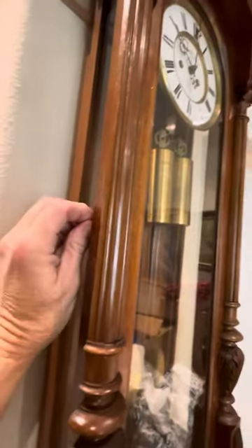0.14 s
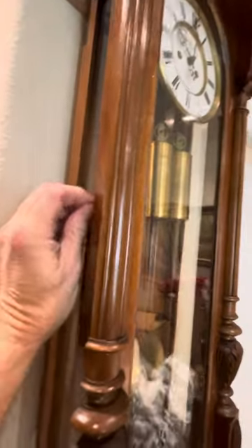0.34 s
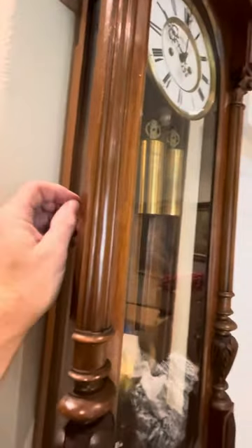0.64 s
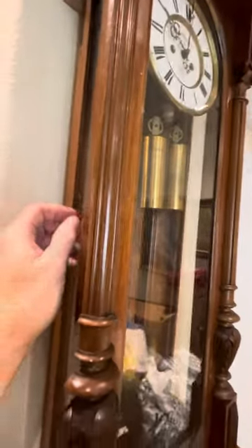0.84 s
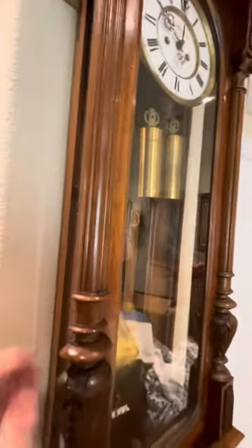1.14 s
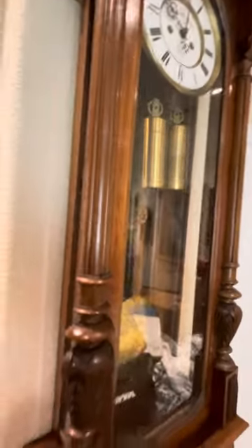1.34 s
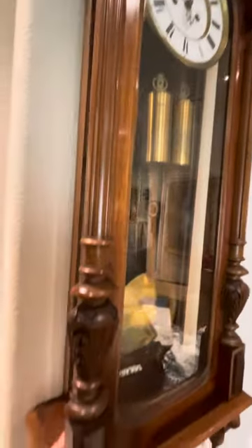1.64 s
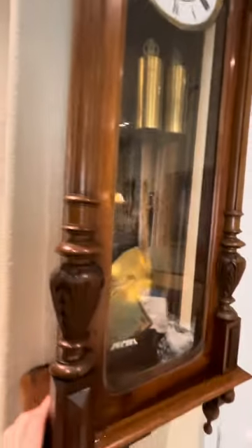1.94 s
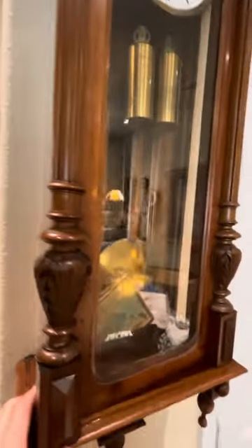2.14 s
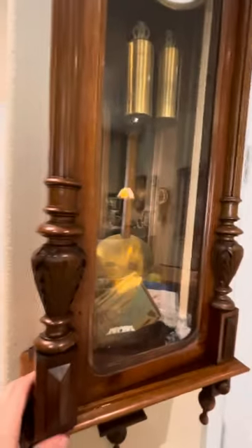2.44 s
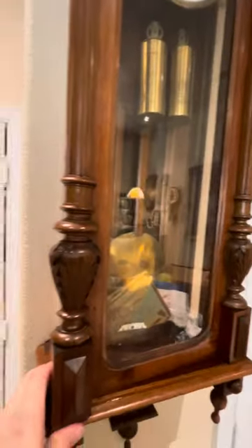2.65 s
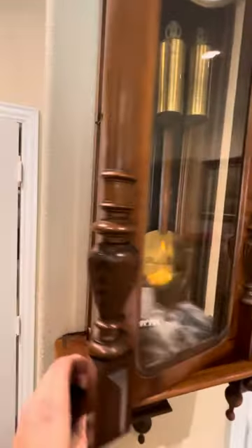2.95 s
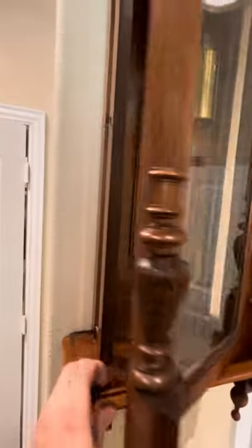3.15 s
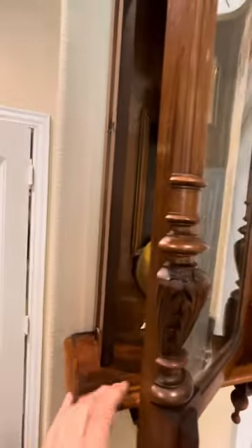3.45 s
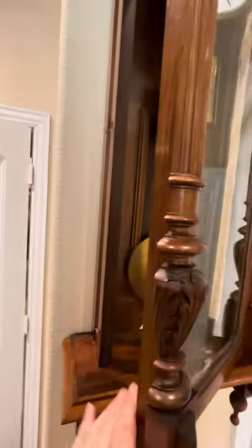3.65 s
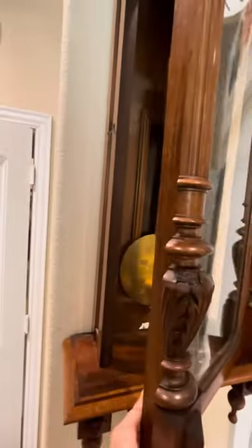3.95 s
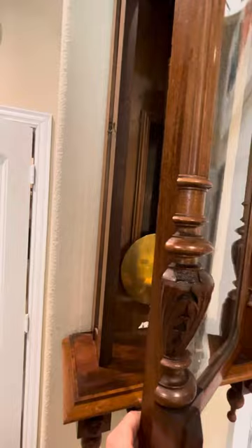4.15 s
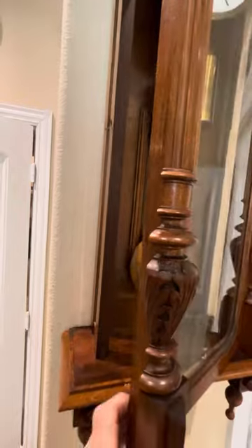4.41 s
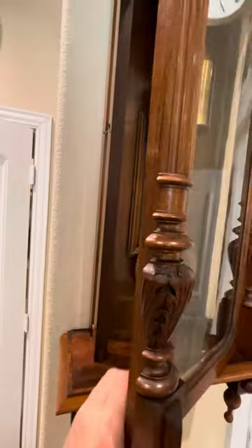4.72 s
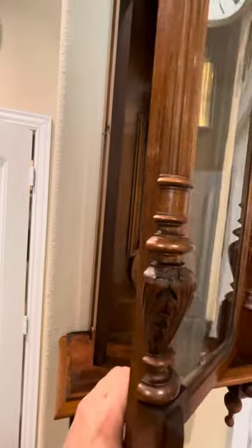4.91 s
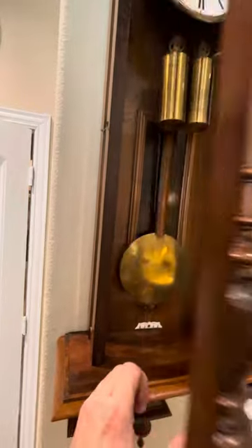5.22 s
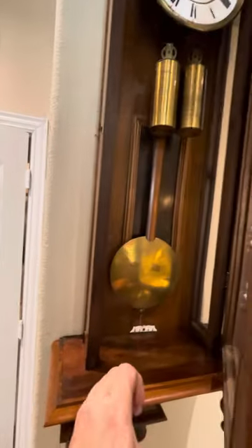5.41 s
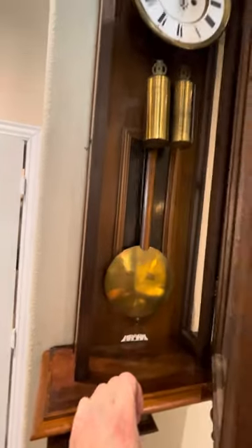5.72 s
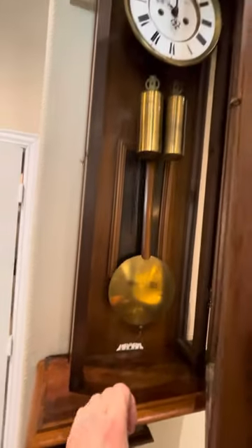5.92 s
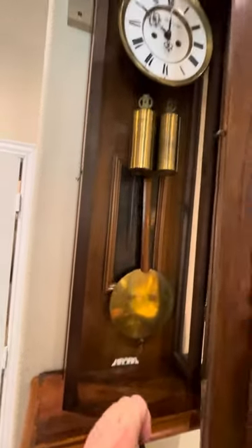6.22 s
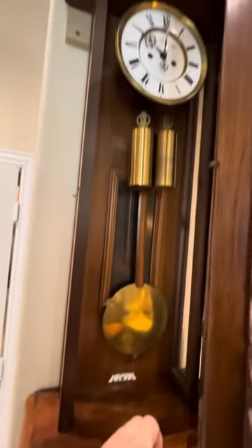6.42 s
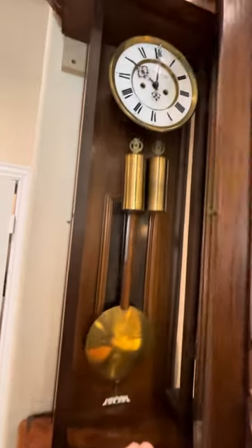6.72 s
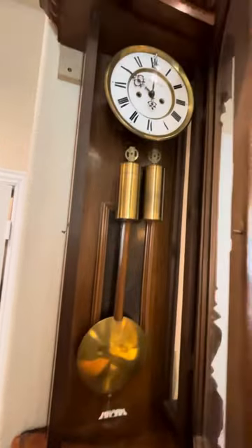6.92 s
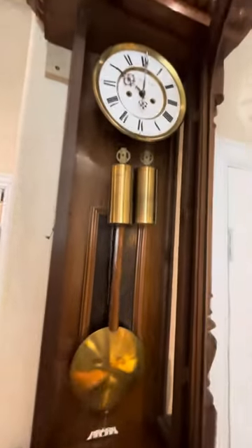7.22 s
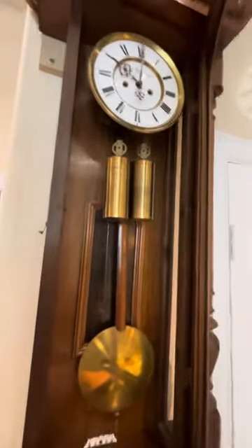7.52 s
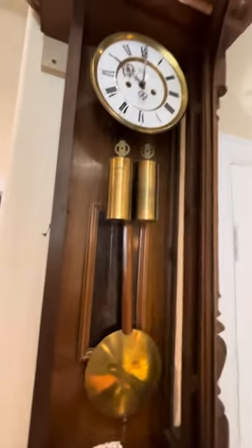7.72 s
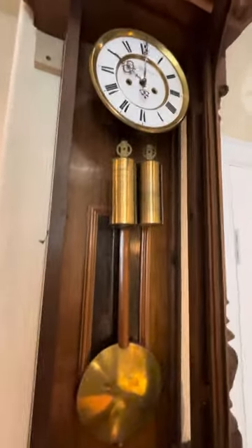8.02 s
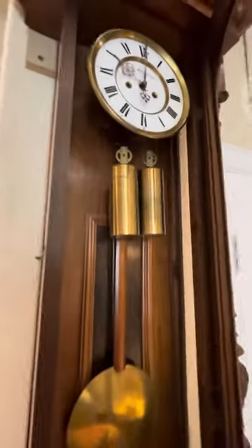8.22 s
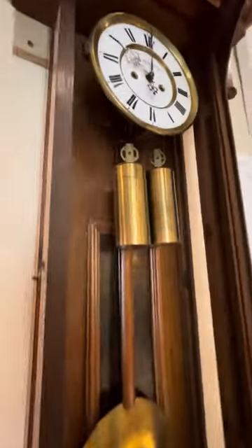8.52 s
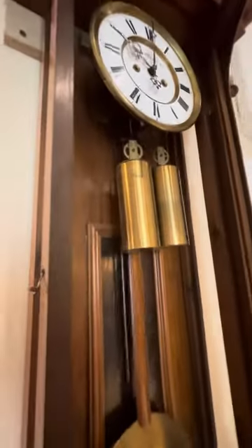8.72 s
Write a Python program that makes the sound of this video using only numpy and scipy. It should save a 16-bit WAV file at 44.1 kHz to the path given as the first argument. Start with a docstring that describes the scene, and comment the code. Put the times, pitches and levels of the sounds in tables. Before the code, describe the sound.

A pendulum wall clock ticks softly and evenly in a quiet room while a hand unlatches its wooden door with snaps, knocks and a brief hinge creak.

```python
"""A room with a pendulum wall clock, ticking softly while a hand unhooks and opens its glazed wooden door.
Catch and door are shaped noise contacts ringing panel and brass; the hinge judders in slips over a noise drag.
Fingers and sleeve are clumpy filtered noise, soft bumps ring the hollow case, and short contacts the movement.
Random echoes, a wavering rumble and still air surround it, heard through a close pair of microphone ports."""
import sys
import numpy as np
from scipy import signal
from scipy.fft import rfft, irfft, next_fast_len
from scipy.io import wavfile

SR = 44100
rng = np.random.default_rng(int(sys.argv[2]) if len(sys.argv) > 2 else 0)


def inscribe(sig):
    """Save sig as 16-bit PCM at rate SR to the path in sys.argv[1].

    A 1-D sig is mono; a 2-D sig holds one channel per row.
    Samples are clipped to [-1, 1] before scaling.
    """
    pcm = np.round(np.clip(np.atleast_2d(sig).T, -1, 1) * 32767)
    wavfile.write(sys.argv[1], SR, pcm.astype(np.int16))


N = 390726
TIME = np.arange(N) / SR  # seconds

# Snaps and knocks of catch and door. Each row: start in seconds, relative level in dB, hardness 0-1,
# relative thump level in dB, resonance of the spot in Hz, boost of that resonance in dB.
KNOCKS = [(0.193, -36.5, 0.71, 15, 900, 3), (0.198, -37.5, 0.54, 10, 330, -7),
          (0.549, -52.5, 0.79, 11.5, 500, 6), (1.176, -76.5, 0.54, 3, 2300, 2),
          (1.847, -48.5, 0.42, 8, 860, 4), (2.0767, -32.5, 0.8, 7.5, 4300, 9.5),
          (2.626, -34.5, 1, 1, 4900, 5.5), (2.779, -48, 0.53, -14.5, 1700, -4.5),
          (2.807, -22, 0.98, 1, 6000, 8), (3.038, -50.5, 0.7, 5, 1700, 7.5),
          (3.222, -53, 0.2, -9, 750, -20), (3.512, -67.5, 0.6, -27, 3200, 14.5),
          (3.527, -39.5, 0.7, 3.5, 3100, 3), (3.7901, -28, 0.87, 0.5, 760, 3.5),
          (4.296, -55.5, 0, 9, 1300, 11.5), (4.314, -37.5, 0.5, 10, 2650, 5),
          (4.33, -39.5, 0.6, 6.5, 2700, 8), (4.564, -68.5, 0.3, -2.5, 1250, 16.5),
          (4.642, -54, 0.9, 14, 1150, 8.5), (4.9247, -25, 1, 7.5, 1070, 5), (4.93, -28, 0.98, 0, 5500, 4),
          (5.351, -54.5, 0.57, 7.5, 5500, -13), (5.4287, -41.5, 0.52, 3, 910, 0),
          (5.513, -47, 0.15, -6, 700, -3), (5.58, -58, 0.06, 0.5, 900, -9), (5.635, -64, 0.35, 10, 700, -3),
          (5.7803, -56.5, 0.86, -9, 3900, 7), (7.872, -42.5, 0.49, -2.5, 2600, 10)]
# Spectrum of the knocks. Each row: frequency in Hz, density in dB per Hz.
KNOCK_COLOUR = [(100, 6.5), (300, 4), (700, 11.5), (1300, 12), (2300, 5), (3700, -4), (5700, -3.5),
                (8500, 2), (11200, 2.5), (12500, -9.5), (13500, -27.5), (15500, -36)]
# Short ring of the wooden door panel. Each row: frequency in Hz, level in dB, t60 in seconds.
PANEL = [(420, -30, .06), (580, -35, .09), (690, -31, .04), (812, -31, .09), (1080, -27, .045),
         (1474, -33, .1), (2126, -26, .035), (2380, -29, .05), (2900, -29, .04), (4213, -28, .018)]
# Bright ring of the brass catch. Each row: frequency in Hz, level in dB, t60 in seconds.
CATCH = [(5050, -34, .07), (5503, -22, .04), (5737, -27, .12), (6187, -27, .035), (10580, -26, .07),
         (10790, -19, .035), (11410, -18, .025)]

# Jerks as the hinge lets go. Each row: start in seconds, relative level in dB, hardness 0-1.
SLIPS = [(6.552, -53, 0.11), (6.592, -56.5, 0), (6.637, -62, 0.2), (6.657, -52, 0.05), (6.702, -58, 0.16),
         (6.742, -57.5, 0), (6.775, -58.5, 0), (6.825, -56, 0.04), (6.883, -52.5, 0.22), (6.928, -52, 0.36),
         (6.962, -51, 0.21), (7.004, -47.5, 0.14), (7.051, -40, 0.6), (7.0936, -40.5, 0.57),
         (7.135, -39, 0.7), (7.171, -45, 0.43), (7.212, -46.5, 0.36), (7.25, -47.5, 0.41),
         (7.312, -59.5, 0.23)]
# Spectrum of a slip. Each row: frequency in Hz, density in dB per Hz.
SLIP_COLOUR = [(100, 6.5), (300, 2), (700, 12.5), (1400, 12), (2200, 6.5), (3800, -6), (6000, -1),
               (8500, 4), (11000, 6), (12500, -35), (14000, -10), (16000, -34.5)]
# Ring of door and hinge under a slip. Each row: frequency in Hz, level in dB, t60 in seconds.
HINGE = [(330, -36, .03), (730, -29, .03), (1150, -30, .03), (1570, -29, .05), (2650, -30, .025),
         (5330, -26, .06)]
# Force of the drag on the hinge as the door swings. Each row: time in seconds, relative level in dB.
DRAG = [(6.555, -53), (6.88, -53.5), (7.03, -46), (7.05, -39), (7.14, -38.5), (7.26, -46), (7.3, -55),
        (7.38, -72)]
# Spectrum of the hinge drag. Each row: frequency in Hz, density in dB per Hz.
DRAG_COLOUR = [(40, -45), (100, -10), (300, -20), (500, 0), (900, -2), (1500, -14), (3000, 6), (5500, -30),
               (9000, -10), (12000, -13.5), (15000, -107)]

# Strokes of hand and sleeve on the wood. Each row: start in seconds, length in seconds,
# relative rub level in dB, relative rustle level in dB.
STROKES = [(0.0, 0.34, -67.5, -98), (0.3, 0.39, -70, -105), (0.693, 0.056, -77, -94.5),
           (0.782, 0.024, -68, -85.5), (1.387, 0.32, -115, -100.5), (1.55, 0.25, -90, -99.5),
           (1.851, 0.043, -69, -79), (1.891, 0.03, -55, -87), (2.05, 0.19, -66.5, -98),
           (2.284, 0.26, -97, -97.5), (2.613, 0.039, -55, -87), (2.799, 0.025, -46, -68),
           (2.892, 0.22, -58, -84), (3.148, 0.025, -54.5, -79), (3.373, 0.17, -72, -91.5),
           (3.534, 0.33, -71.5, -92), (3.964, 0.033, -78, -83), (4.225, 0.22, -71, -84.5),
           (4.356, 0.3, -64.5, -112), (4.694, 0.2, -66.5, -85), (4.975, 0.3, -68, -79.5),
           (5.38, 0.13, -60.5, -95), (5.62, 0.28, -70, -100), (6.36, 0.16, -74, -103), (8.3, 0.5, -77, -99),
           (7.851, 0.14, -74, -81.5), (8.142, 0.081, -74, -76)]
# Spectrum of skin on wood. Each row: frequency in Hz, density in dB per Hz.
RUB_COLOUR = [(60, 5), (150, 2), (300, 0), (500, -8), (800, -3.5), (1500, -15), (4000, -26.5),
              (12000, -60.5)]
# Spectrum of the sleeve. Each row: frequency in Hz, density in dB per Hz.
RUSTLE_COLOUR = [(400, -2.5), (1200, -2), (2800, 4.5), (4000, -4.5), (5500, -0.5), (8000, -6), (10000, -2),
                 (11300, -3.5), (12800, -48), (16000, -50.5)]
# Fingertips scuffing the hollow wood. Each row: start in seconds, relative level in dB, pitch in Hz,
# time scale of the swell and fade in seconds.
SCUFFS = [(0.816, -62, 700, 0.046), (1.871, -71, 637, 0.14), (1.908, -76, 2100, 0.041),
          (1.914, -60.5, 4730, 0.019), (3.202, -60, 750, 0.026), (5.514, -55, 690, 0.008)]

# Soft bumps of door and hand on the case. Each row: start in seconds, relative level in dB,
# length of the push in seconds.
BUMPS = [(0.202, -32.5, 0.0009), (0.409, -40, 0.0051), (0.472, -42.5, 0.0051), (1.949, -41.5, 0.00092),
         (2.105, -41, 0.0055), (2.809, -28.5, 0.00055), (2.896, -37, 0.00072), (2.991, -35, 0.0025),
         (3.04, -42, 0.0015), (3.497, -45.5, 0.0043), (4.068, -40.5, 0.0036), (4.31, -22, 0.004),
         (4.357, -24, 0.0059), (4.575, -49, 0.0027), (4.639, -41.5, 0.0045)]
# Boom of the hollow case. Each row: frequency in Hz, level in dB, t60 in seconds.
CASE = [(81, -14, .15), (139, -2, .28), (183, -4, .12), (232, 0, .09), (292, 1, .12), (334, -5, .08),
        (415, -14, .06), (506, -18, .06), (690, -16, .06), (812, -16, .06)]
# Padded knocks of the open door and the hand. Each row: start in seconds, level in dB, pitch in Hz.
NUDGES = [(1.857, -46, 470), (7.538, -51, 375), (7.557, -48, 390), (7.677, -53, 340), (8.249, -38.5, 450)]
# Ring of a padded knock. Each row: multiple of the pitch, level in dB, t60 in seconds.
NUDGE_RING = [(1, 0, .045), (1.58, -9, .03), (2.5, -6, .03), (4.6, -11, .015)]
# Small hollow pips of the door frame. Each row: start in seconds, relative level in dB.
PIPS = [(1.978, -47.5), (2.4773, -60), (6.488, -47)]
# Ring of the door frame. Each row: frequency in Hz, level in dB, t60 in seconds.
FRAME = [(1620, -2, .024), (2080, -4, .028), (3800, -13, .02)]

# Ring of the brass movement. Each row: frequency in Hz, level in dB under the tick,
# level in dB under the tock, t60 in seconds.
MOVEMENT = [(1320, -1, 2, .03), (2170, 3, -6, .035), (2390, 0, 2, .03), (2740, 5, 5, .04),
            (3150, -2, 3, .018), (5420, -1, -9, .035)]
# Level of the beat as the listener moves and the door opens. Each row: time in seconds, relative level in dB.
BEAT_LEVEL = [(.8, -49.5), (1.5, -53), (2.3, -55), (5.2, -49), (7.4, -48.5), (8.2, -44)]

# Spectrum of the low sway. Each row: frequency in Hz, density in dB per Hz.
RUMBLE_COLOUR = [(20, -30), (35, -8), (48, 0), (75, -4), (110, -6), (200, -18), (500, -42), (3000, -90)]
# Spectrum of the still air. Each row: frequency in Hz, density in dB per Hz.
AIR = [(60, 6), (110, 0), (200, -12), (450, -20), (1200, -19), (4000, -20), (7000, -25), (11000, -30),
       (13000, -40), (15000, -52)]
# The room. Each row: frequency in Hz, t60 in seconds, echo level in dB.
ROOM = [(100, 0.43, 0.5), (298, 0.19, 3), (1179, 0.34, 1), (3500, 0.3, -5.5), (7137, 0.38, -4),
        (13000, 0.6, -14.5)]
# The microphone ports. Each row: frequency in Hz, phase lag of the right port in radians,
# left-right likeness 0-1, left minus right in dB.
PORTS = [(100, 0, .95, 1), (300, .3, .85, 1), (420, 1.4, .55, 3), (600, 2.8, .35, 5.5), (1050, 3.3, .75, 3),
         (1400, 4.1, .5, 2), (1850, 3.6, .2, 0), (2400, 3.4, .65, -3), (3200, 4, .5, 0),
         (4100, 6, .45, -.5), (5400, 6.3, .5, 0), (6400, 6.7, .75, -1.7), (7500, 8.3, .7, -.5),
         (8300, 9, .95, -.5), (9500, 9.1, .98, -.5), (12200, 12.5, .98, 0), (13800, 13, .9, .5)]

# Contacts, (softest, hardest), before each source's own trim: less thump, more crack, shorter chatter.
THUMP_DB, CRACK_DB, CONTACT_T60_S = (7.5, -17), (-29.5, 6), (0.075, 0.014)
CONTACT_RISE_S = 0.0032  # time constant; the crack rises in half of it
SPOT_Q = 4
PANEL_DB, CATCH_DB = -14, -17
# From knock to knock: largest change of a mode's strength either way, and of its pitch as a share.
MODE_UNEVEN_DB, MODE_DETUNE = 4, .01

SLIP_STRETCH = 1.35  # multiplies the contact t60
SLIP_SPOT_HZ, SLIP_SPOT_DB = (600, 2800), 6  # each slip favours a random pitch in this span
# Small catches of the hinge: how many a second, spread of sizes, pitch span, level relative to the drag.
CREAKS_PER_S, CREAK_SPREAD_DB, CREAK_HZ, CREAK_DB = 160, 4, (350, 2200), -5
GRAIN_CYCLES, GRAIN_TILT_DB = 13, 4.5  # t60 of a grain in cycles; gain per octave above the lowest pitch

STROKE_ATTACK_S, STROKE_RELEASE_S = .03, .06  # linear rise; time constant of the fade
SCUFF_WIDTH = 1.32  # ratio of pitch to either side
# The loose door: contacts a second, level relative to the rub gain, spread of sizes, pitch span.
RATTLES_PER_S, RATTLE_DB, RATTLE_SPREAD_DB, RATTLE_BAND_HZ = 120, -1, 2.5, (300, 3000)

# The pendulum: one tick and one tock per swing, slightly out of beat.
FIRST_TOCK_S, FIRST_TICK_S, SWING_S = .009, .792, 1.4776
TOCK_DB = -.5  # tock strike relative to tick strike
DROP_CLICK_DB = 29  # gain of the band-passed strike beside its ring

# Low sway: at rest, then relative to the rub gain and to the hinge drag; depth of the waver.
REST_SWAY_DB, RUB_SWAY_DB, DRAG_SWAY_DB, SWAY_WAVER_DB = -66.5, 1, -4, 1
AIR_DB = -73  # rms ahead of the ports
TICK_ROOM_SHARE, THUD_ROOM_SHARE = .4, .6  # the rest stays close
ECHO_RISE_S, ECHOES_CHANGE_S, ECHO_UNEVEN_DB = .003, .9, 2.7
CUTOFF_HZ = 16500


def door():
    """Catch and door snap and knock, each spot with a short resonance of its own."""
    contacts = np.zeros((2, N))
    for s, db, hardness, thump_db, spot_hz, spot_db in KNOCKS:
        hit = blow(hardness, thump_db=thump_db + 4.5, crack_db=8.0, thump_t60=0.081, stretch=0.88)
        add(contacts, s, from_db(db) * wood(boost_spot(hit, spot_hz, spot_db)))
    return from_db(10.0) * colour(contacts, KNOCK_COLOUR)


def blow(hardness, thump_db, crack_db, thump_t60, stretch):
    """Wood struck: a low thump and a clack; a harder contact is shorter and cracks louder up high."""
    t60, rise = stretch * between(CONTACT_T60_S, hardness), CONTACT_RISE_S
    high_db = between(CRACK_DB, hardness) + crack_db
    low_db = between(THUMP_DB, hardness) + thump_db
    thump = from_db(low_db) * band(burst(thump_t60, rise), [130, 400], "band")
    clack = band(burst(t60, rise), [420, 2400], "band")
    snap = from_db(high_db / 2 + 11.0) * band(burst(t60, rise), [2500, 5500], "band")
    crack = from_db(high_db) * band(burst(t60 * .7, rise / 2), 5600, "high")
    return thump + clack + snap + crack


def boost_spot(hit, hz, db):
    """The spot that is struck resonates, lifting or dipping the contact around one pitch."""
    spot = signal.lfilter(*signal.iirpeak(hz, SPOT_Q, fs=SR), hit)
    return hit + (from_db(db) - 1) * spot


def wood(contact):
    """A contact rings the door panel and its brass catch, the modes in other proportions each time."""
    out = contact
    for modes, db in ((PANEL, PANEL_DB), (CATCH, CATCH_DB)):
        hz, mode_db, t60 = np.transpose(modes)
        detune, uneven = rng.uniform(-1, 1, (2, len(modes)))
        mode_hz = hz * (1 + MODE_DETUNE * detune)
        mode_level = mode_db + MODE_UNEVEN_DB * uneven
        out = out + from_db(db) * ring(contact, zip(mode_hz, mode_level, t60))
    return out


def hinge():
    """The hinge sticks and slips unevenly and rings the door; drag noise surges after each slip."""
    jerks = np.zeros((2, N))
    for s, db, hardness in SLIPS:
        hit = blow(hardness, thump_db=4.5, crack_db=10.5, thump_t60=0.15, stretch=SLIP_STRETCH)
        spot_hz = np.exp(rng.uniform(*np.log(SLIP_SPOT_HZ)))
        add(jerks, s, from_db(db) * boost_spot(hit, spot_hz, SLIP_SPOT_DB))
    jerks = colour(jerks, SLIP_COLOUR)
    judder = from_db(9.5) * jerks + from_db(-4.5) * ring(jerks, HINGE)
    starts = np.array(SLIPS)[:, 0]
    latest = np.maximum(np.searchsorted(starts, TIME) - 1, 0)
    since_slip = np.abs(TIME - starts[latest])
    sliding = from_db(-5) * np.exp(-since_slip / .02)
    return judder + sliding * level(DRAG) * friction(DRAG_COLOUR, grain_db=-1.0)


def creak():
    """Along with its jerks the dry hinge catches in many small ringing grains."""
    return from_db(CREAK_DB) * level(DRAG) * grains(CREAKS_PER_S, CREAK_SPREAD_DB, CREAK_HZ)


def strokes():
    """Gains of rub and rustle over time: each stroke swells, holds and dies away."""
    rub = rustle = 0
    for s, length, rub_db, rustle_db in STROKES:
        swell = np.clip((TIME - s) / STROKE_ATTACK_S, 0, 1)
        fade = np.exp(-np.clip((TIME - s - length) / STROKE_RELEASE_S, 0, 20))
        rub = rub + from_db(rub_db) * swell * fade
        rustle = rustle + from_db(rustle_db) * swell * fade
    return rub, rustle


def hand(rub, rustle):
    """Skin rubs in uneven scrapes and stirs the door panel; a sleeve brushes above it in pitch."""
    skin = friction(RUB_COLOUR, grain_db=4) * from_db(2 * flicker(25))
    cloth = friction(RUSTLE_COLOUR, grain_db=2.5) * from_db(1.5 * flicker(18))
    stirred = skin + from_db(-36.0) * ring(skin, PANEL)
    return from_db(9.5) * rub * stirred + from_db(27.0) * rustle * cloth


def scuffs():
    """A fingertip drags for a moment and the wood answers around one pitch, as band-passed noise."""
    out = np.zeros((2, N))
    for s, db, hz, length in SCUFFS:
        t = TIME[:SR // 2] / length
        grit = band(rng.standard_normal((2, len(t))), [hz / SCUFF_WIDTH, hz * SCUFF_WIDTH], "band")
        add(out, s, from_db(db + 33.5) * grit / grit.std() * t * np.exp(-3.5 * t))
    return out


def rattle(rub):
    """The loose glazed door rattles under the hand in small uneven contacts that follow the rub."""
    return from_db(RATTLE_DB) * rub * grains(RATTLES_PER_S, RATTLE_SPREAD_DB, RATTLE_BAND_HZ)


def bumps():
    """A soft push wakes the hollow case; the longer it lasts, the deeper the thud."""
    force = np.zeros((2, N))
    for s, db, length in BUMPS:
        push = np.hanning(max(int(length * SR), 8))
        add(force, s, from_db(db) * push / push.sum() * [[1], [.5]])
    # the thud carries nothing below about 90 Hz
    return band(ring(force, CASE), 90, "high")


def nudges():
    """A padded knock rings the wood for a few cycles, with no added crack."""
    out = np.zeros((2, N))
    for s, db, hz in NUDGES:
        modes = [(hz * ratio, mode_db, t60) for ratio, mode_db, t60 in NUDGE_RING]
        knock = ring(burst(t60=.02, rise=.001), modes)
        add(out, s, from_db(db) * knock / np.abs(knock).max())
    return out


def frame():
    """The door frame gives small dry pips: short contacts ringing three modes."""
    return from_db(9) * ring(taps(PIPS, t60=0.012, rise=0.001), FRAME)


def escapement():
    """The escape wheel drops on each pallet in turn, rattles briefly and rings the movement."""
    tick = taps(beats(FIRST_TICK_S, 0), t60=.055, rise=.002)
    tock = taps(beats(FIRST_TOCK_S, TOCK_DB), t60=.08, rise=.002)
    modes = np.array(MOVEMENT)
    rings = ring(tick, modes[:, [0, 1, 3]]) + ring(tock, modes[:, [0, 2, 3]])
    return rings + from_db(DROP_CLICK_DB) * band(tick + tock, [1100, 3500], "band")


def beats(first_s, db):
    """One pallet's drops, once a swing, as pairs of time in seconds and relative level in dB."""
    times = np.arange(first_s, TIME[-1], SWING_S)
    return zip(times, db + np.interp(times, *np.transpose(BEAT_LEVEL)))


def sway(rub):
    """Case and microphone sway: a wavering low rumble that grows as hand or hinge loads the case."""
    gain = from_db(REST_SWAY_DB) + from_db(RUB_SWAY_DB) * rub + from_db(DRAG_SWAY_DB) * level(DRAG)
    waver = from_db(SWAY_WAVER_DB * flicker(7))
    return gain * waver * friction(RUMBLE_COLOUR, grain_db=-2.0)


def still_air():
    """A steady bed of coloured noise, slightly grainy."""
    return from_db(AIR_DB) * friction(AIR, grain_db=3.0)


def room(x):
    """The listener keeps moving, so each stretch of sound meets another pattern of echoes."""
    out, size = x.copy(), int(ECHOES_CHANGE_S * SR)
    for start in range(0, N, size):
        add(out, start / SR, signal.fftconvolve(x[:, start:start + size], echoes(), axes=1))
    return out


def echoes():
    """Dense, uneven echoes build up over a few milliseconds and die at a rate of their own in each band."""
    t, edges, out = TIME[:SR * 3 // 5], np.geomspace(50, 16000, 11), 0
    for low, high in zip(edges, edges[1:]):
        hz = np.sqrt(low * high)
        decay = from_db(-60 * t / at_hz(ROOM, hz)) * (1 - np.exp(-(t / ECHO_RISE_S) ** 2))
        gain = from_db(at_hz(ROOM, hz, axis=2)) / np.sqrt(np.sum(decay ** 2))
        out = out + gain * decay * band(rng.standard_normal((2, len(t))), [low, high], "band")
    uneven = from_db(ECHO_UNEVEN_DB * flicker(500, size=len(t)))
    return out * uneven / np.sqrt(np.mean(uneven ** 2))


def ports(x):
    """Two close ports hear a common part and an opposed part; the right one lags in phase."""
    size = next_fast_len(N + SR // 10)
    common, apart = rfft(x, size)
    hz = np.arange(len(common)) * SR / size
    alike = np.clip(at_hz(PORTS, hz, axis=2), 0, 1)
    common = common * np.sqrt((1 + alike) / 2)
    apart = apart * np.sqrt((1 - alike) / 2)
    lean = from_db(at_hz(PORTS, hz, axis=3) / 2)
    lag = np.exp(-1j * at_hz(PORTS, hz, axis=1))
    left = (common + apart) * lean
    right = (common - apart) * lag / lean
    return irfft(np.array([left, right]), size)[:, :N]


def burst(t60, rise):
    """A contact: chatter, fairly even in spectrum, that builds up and dies away, along two paths."""
    t = TIME[:SR // 4]
    decay = from_db(-60 * t / max(t60, .002))
    envelope = decay * (1 - np.exp(-t / max(rise, .0001)))
    spectrum = rfft(rng.standard_normal((2, len(t))) * envelope)
    # dividing by the root of the magnitude halves the spectrum's ups and downs in dB
    chatter = irfft(spectrum / np.sqrt(np.abs(spectrum)), len(t)) * decay ** .2
    return chatter * np.sqrt(2 * np.sum(envelope ** 2) / np.sum(chatter ** 2))


def taps(rows, t60, rise):
    """Short contacts, evened to unit energy and scaled by their dB."""
    out = np.zeros((2, N))
    for s, db in rows:
        contact = burst(t60, rise)
        add(out, s, from_db(db) * contact / np.sqrt(np.sum(contact ** 2) / 2))
    return out


def ring(force, modes):
    """Each mode rings as a decaying sine of its own height; neighbours swing in opposite directions."""
    out = 0
    for k, (hz, db, t60) in enumerate(modes):
        r, w = from_db(-60 / (t60 * SR)), 2 * np.pi * hz / SR
        poles = [1, -2 * r * np.cos(w), r * r]
        # the tiny offset keeps the filter clear of vanishingly small numbers
        swing = signal.lfilter([0, np.sin(w)], poles, force + 1e-18)
        out = out + (-1) ** k * from_db(db) * swing
    return out


def friction(spectrum, grain_db):
    """Two channels of noise as countless tiny contacts of uneven size, coming in clumps; rms 1."""
    clumps = np.minimum(flicker(700) + .8 * flicker(60), 1.6)
    x = colour(rng.standard_normal((2, N)) * from_db(grain_db * clumps), spectrum)
    return x / x.std()


def grains(per_s, spread_db, span_hz, count=16):
    """Tiny contacts at random moments, each sized at random and ringing at one of a set of pitches; rms 1."""
    total = int(per_s * TIME[-1])
    at, dealt = rng.integers(0, N, total), rng.integers(0, count, total)
    sizes_db = spread_db * np.minimum(rng.exponential(1, total), 3)
    sizes = from_db(sizes_db) * rng.choice([-1, 1], (2, total))
    out = 0
    for k, hz in enumerate(np.geomspace(*span_hz, count)):
        clicks = np.zeros((2, N))
        clicks[:, at[dealt == k]] = sizes[:, dealt == k]
        tilt_db = GRAIN_TILT_DB * np.log2(hz / span_hz[0])
        out = out + ring(clicks, [(hz, tilt_db, GRAIN_CYCLES / hz)])
    return out / out.std()


def colour(x, spectrum):
    """Causal (minimum-phase) filter with the given spectrum, built by folding its cepstrum."""
    size = 4096
    hz = np.arange(size // 2 + 1) * SR / size
    cepstrum = irfft(np.log(from_db(at_hz(spectrum, hz))))
    cepstrum[1:size // 2] *= 2
    cepstrum[size // 2 + 1:] = 0
    response = irfft(np.exp(rfft(cepstrum)))
    return signal.oaconvolve(x, response[None], axes=1)[:, :N]


def band(x, hz, kind):
    """Causal Butterworth filter of design order two."""
    return signal.sosfilt(signal.butter(2, hz, kind, fs=SR, output="sos"), x)


def flicker(per_s, size=N):
    """A random line through new values so many times a second."""
    knots = np.arange(0, TIME[size - 1] + 1, 1 / per_s)
    return np.interp(TIME[:size], knots, rng.standard_normal(len(knots)))


def level(rows, axis=1):
    """Gain over time from a dB column, all but silent outside its span."""
    table = np.array(rows)
    return from_db(np.interp(TIME, table[:, 0], table[:, axis], left=-150, right=-150))


def at_hz(points, hz, axis=1):
    """One column of a table, read on a log-frequency axis."""
    table = np.array(points)
    return np.interp(np.log(np.maximum(hz, 1)), np.log(table[:, 0]), table[:, axis])


def between(ends, hardness):
    """A value that runs from the softest contact to the hardest."""
    return np.interp(hardness, [0, 1], ends)


def from_db(db):
    """Decibels to gain."""
    return 10 ** (np.asarray(db) / 20)


def add(out, s, sound):
    """Mix a short sound in at time s."""
    start = max(round(s * SR), 0)
    out[:, start:start + sound.shape[-1]] += sound[:, :N - start]


def scene():
    """Door, hinge, rattle and scuffs in the room, ticks and thuds partly close, hand close, over rumble and air."""
    rub, rustle = strokes()
    ticks, thuds = escapement() + frame(), bumps() + nudges()
    tick_share, thud_share = np.clip([TICK_ROOM_SHARE, THUD_ROOM_SHARE], 0, 1)
    moving_door = door() + rattle(rub) + hinge() + creak() + scuffs()
    roomy = room(moving_door + tick_share * ticks + thud_share * thuds)
    close = (1 - tick_share) * ticks + (1 - thud_share) * thuds + hand(rub, rustle)
    return ports(roomy + close + sway(rub) + still_air())


def record(dry):
    """The deepest bass is thinned, the highest peaks are rounded and the top is cut steeply."""
    rounded = .8 * np.tanh(band(dry, 38, "high") / .8)
    return signal.sosfilt(signal.cheby2(12, 60, CUTOFF_HZ, fs=SR, output="sos"), rounded)


dry = scene()
out = record(dry)
inscribe(out)
```